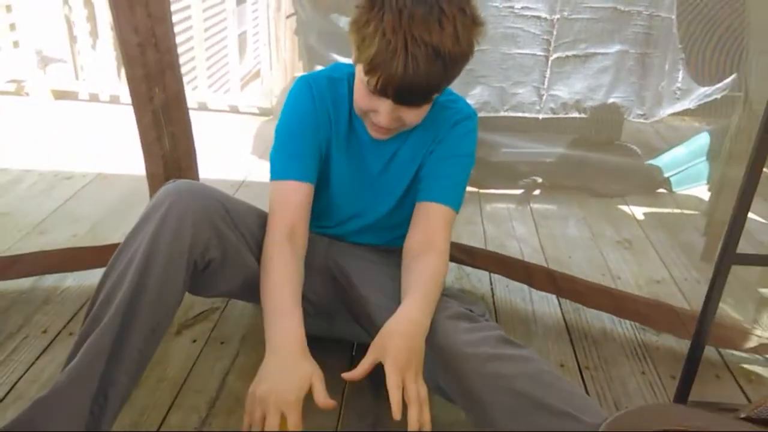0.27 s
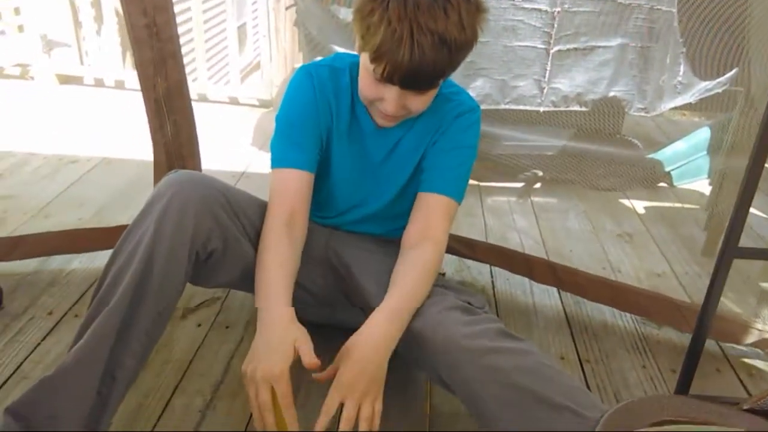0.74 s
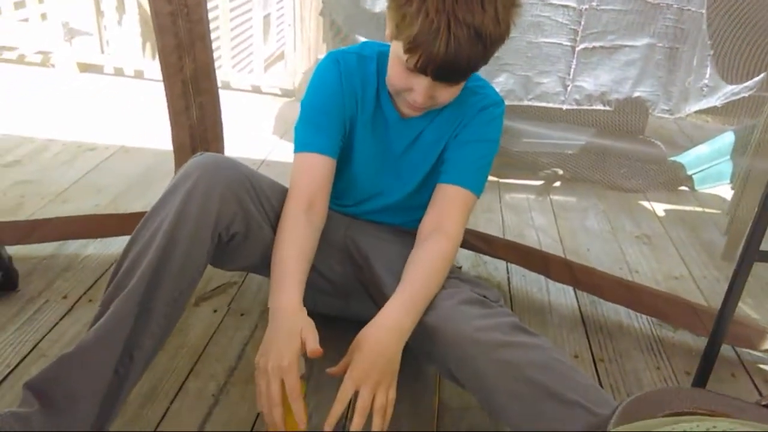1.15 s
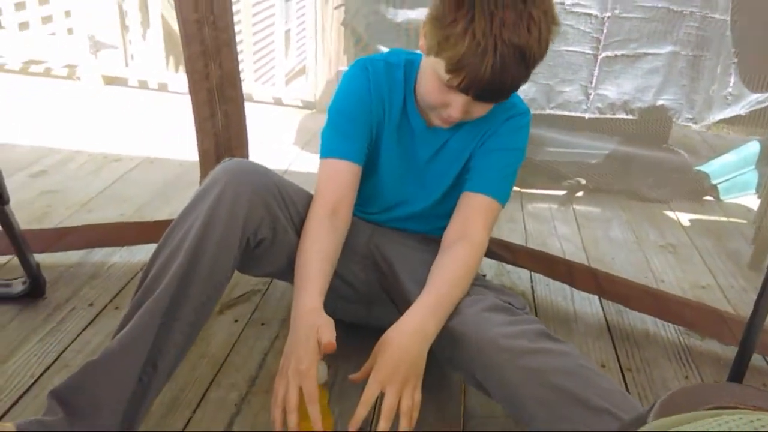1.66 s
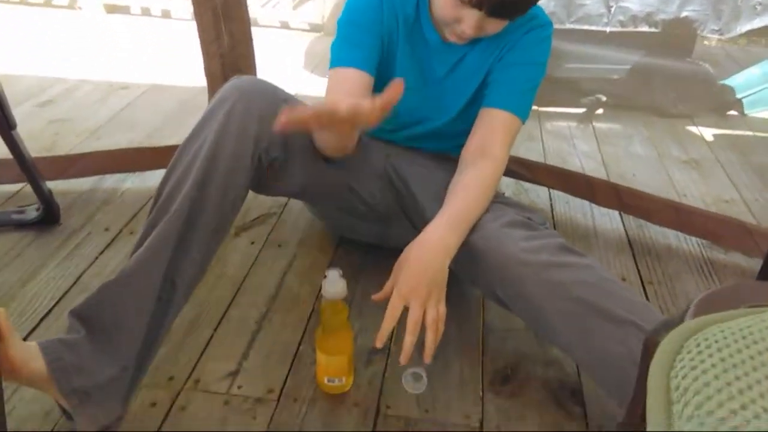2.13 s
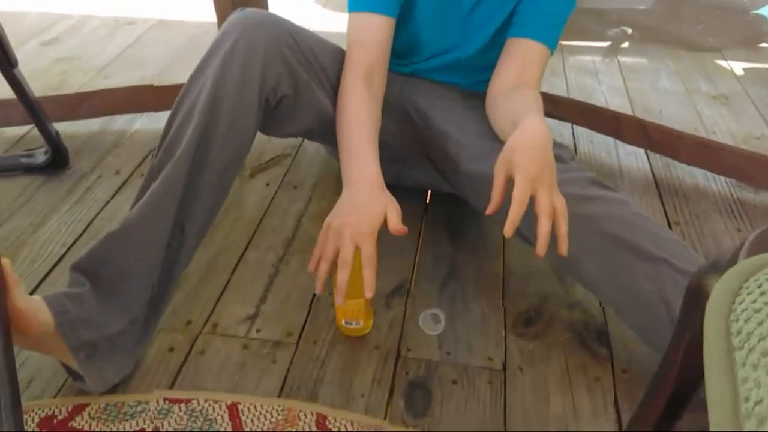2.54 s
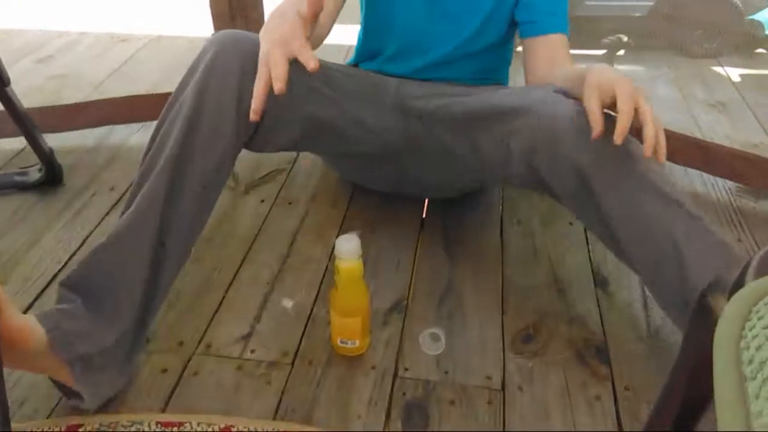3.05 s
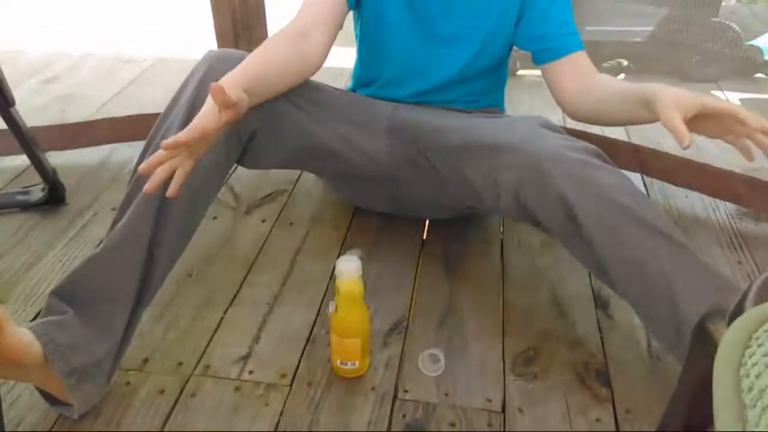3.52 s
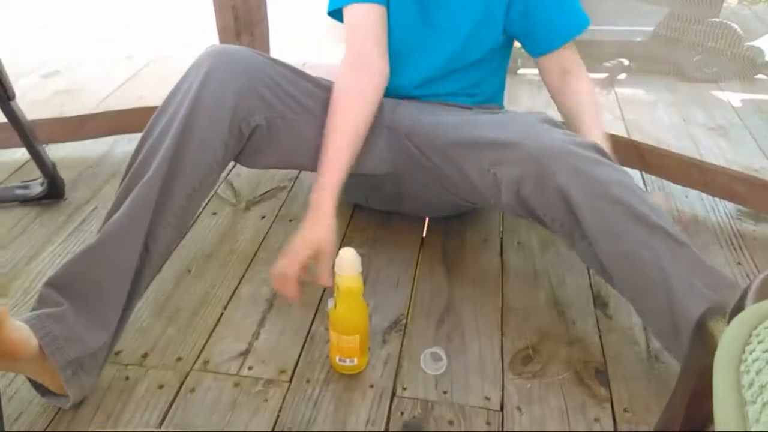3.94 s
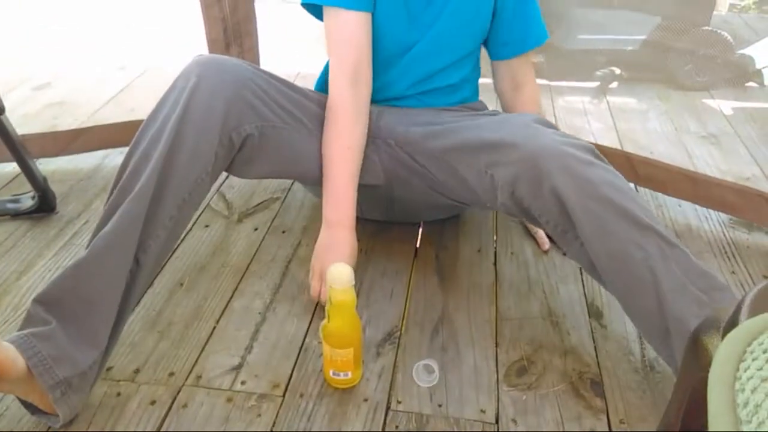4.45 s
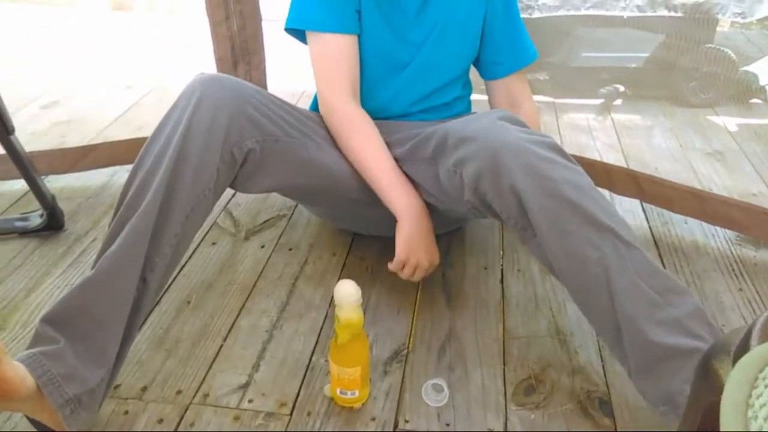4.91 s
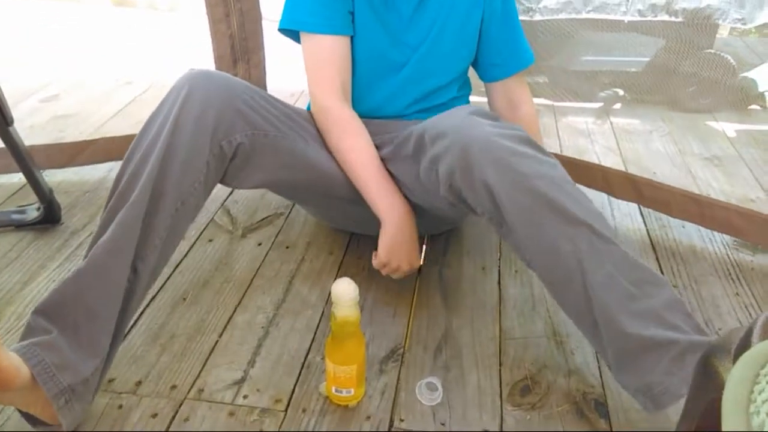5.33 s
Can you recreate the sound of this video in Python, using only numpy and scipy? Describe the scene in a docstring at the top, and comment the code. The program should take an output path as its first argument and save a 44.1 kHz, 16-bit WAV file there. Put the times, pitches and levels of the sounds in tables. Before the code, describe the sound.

Very close on an outdoor wooden porch, a dull slap on a plastic plunger opens the scene, its thump leaving a short hum. After two quiet seconds with a faint bird, a much louder slap cracks the stopper loose with a quick burst of gas. Boards hum, small plastic clacks and spits of fizz follow, then falling bird whistles over a soft outdoor hush.

```python
"""A palm slaps a plastic plunger on a glass soda bottle, near the microphone on porch boards: once in vain,
then the stopper pops. Blows and small ticks are noise and taps ringing body modes; gas and foam are coloured
noise, the gas with a sinking whistle. After each slap the deck hums and a diffuse noisy tail swells in steps
and dies away. Behind lie falling whistles of a near and a far bird, rustling cloth and a steady outdoor hush.
"""
import sys
import numpy as np
from scipy import signal
from scipy.fft import rfft, irfft, next_fast_len
from scipy.io import wavfile
from scipy.ndimage import uniform_filter1d, map_coordinates

SR = 44100
rng = np.random.default_rng(int(sys.argv[2]) if len(sys.argv) > 2 else 0)


def generate_wav(sig):
    """Save sig (samples, or channels by samples) to the path in sys.argv[1] as 16-bit PCM at SR."""
    pcm = np.round(np.clip(np.atleast_2d(sig).T, -1, 1) * 32767).astype(np.int16)
    wavfile.write(sys.argv[1], SR, pcm)


N = 245725


def amp(db):
    """Gain of a level in dB."""
    return 10 ** (np.asarray(db) / 20)


def unit(x):
    """x at rms 1."""
    return x / np.sqrt(np.mean(x ** 2) + 1e-20)


def along(points, hz):
    """Values of (frequency [Hz], value) points, read on a log frequency axis."""
    f, v = np.transpose(points)
    return np.interp(np.log(hz + 1), np.log(f + 1), v)


def curve(rows):
    """One value per sample through (time [s], value) points."""
    s, values = np.transpose(rows)
    return np.interp(np.arange(N) / SR, s, values)


def wobble(rate):
    """A smooth random curve, rate knots a second."""
    knots = rng.standard_normal(int(N * rate / SR) + 4)
    return map_coordinates(knots, [np.arange(N) * rate / SR])


def swells(rows):
    """Sum of bell-shaped gains from (middle [s], level [dB], half length [s]) rows."""
    t = np.arange(N) / SR
    return sum(amp(db) * np.exp(-((t - s) / half) ** 2) for s, db, half in rows)


def filtered(x, response):
    """x times a complex response of frequency."""
    m = next_fast_len(len(x) + SR // 2)
    return irfft(rfft(x, m) * response(np.fft.rfftfreq(m, 1 / SR)), m)[:len(x)]


def modes(table):
    """Causal response of (frequency [Hz], width [Hz], level [dB]) resonances with alternating signs."""
    def response(f):
        total = 0
        for k, (centre, width, db) in enumerate(table):
            resonance = 1j * f * width / (centre * centre - f * f + 1j * f * width)
            total = total + (-1) ** k * amp(db) * resonance
        return total
    return response


def rush(spectrum, spiky_db=0):
    """Coloured noise of rms 1; spiky sample sizes make it crackle."""
    size_curve = uniform_filter1d(rng.standard_normal(N), size=24) * np.sqrt(24)
    grains = rng.standard_normal(N) * amp(spiky_db * size_curve)
    return unit(filtered(grains, lambda hz: amp(along(spectrum, hz))))


def add(track, s, sound):
    """Mixes a sound into the track at a time in seconds."""
    part = track[max(round(s * SR), 0):][:len(sound)]
    part += sound[:len(part)]


def tail(t60s, seconds):
    """Diffuse noise of energy 1; each frequency dies at its own speed."""
    hz, t, z = signal.stft(rng.standard_normal(int(seconds * SR)), SR, nperseg=256)
    fade = amp(-60 * t / along(t60s, hz)[:, None])
    h = signal.istft(z * fade, SR, nperseg=256)[1]
    return h / np.linalg.norm(h)


def struck(table, hz, reach_db, clean, size):
    """A body rung by a clean tap and by chatter; the place of contact favours the modes near hz."""
    # a mode loses reach_db for each octave between it and hz
    response = modes([(c, w, db - reach_db * abs(np.log2(c / hz))) for c, w, db in table])
    chatter = unit(filtered(rng.standard_normal(size), response))
    ring = filtered(np.arange(size) == 0, response)
    return chatter + clean * ring / np.abs(ring).max()


# palm blows and the knocks that follow them:
# (time [s], crack level [dB], favoured crack pitch [Hz], thud level [dB], favoured thud pitch [Hz])
BLOW_EVENTS = [(0.0, -28.5, 3480, -32, 190), (0.011, -30, 2480, -38.5, 80), (2.144, -30, 2600, -26, 338),
               (2.152, -22, 2300, -37, 345), (2.155, -12.5, 1520, -29.5, 650),
               (2.157, -19.5, 5700, -42, 245), (2.1632, -18, 2400, -31, 130),
               (2.177, -25.5, 2600, -37, 130), (2.188, -34.5, 2804, -26.5, 320.3),
               (2.202, -29, 2980, -44, 249), (2.228, -31, 2504, -45, 150), (2.235, -34.5, 2106, -44, 150),
               (2.253, -45, 2500, -56, 150)]
# plastic and glass under the palm: (frequency [Hz], width [Hz], relative level [dB])
PLUNGER_MODES = [(670, 240, -11.5), (1464, 300, 1), (2107, 180, 1), (2400, 220, 3.5), (2700, 690, 2),
                 (3900, 1600, -3.5), (4761, 300, 1), (5740, 630, -3), (9100, 2200, -2)]
# porch boards under the bottle: (frequency [Hz], width [Hz], relative level [dB])
BOARD_MODES = [(74.9, 28, -13), (130, 26, 1), (230, 40, -5), (334, 34, 4), (400, 40, -6.5), (650, 89, -14)]
CRACK_T60_S, THUD_T60_S = 0.051, .085


def blows():
    """Each blow rattles the plunger and shakes the boards for a moment."""
    out, t = np.zeros(N), np.arange(SR // 4) / SR
    crack_fade = amp(-60 * t / CRACK_T60_S) * (1 - np.exp(-t / 0.0012))
    thud_fade = amp(-60 * t / THUD_T60_S) * (1 - np.exp(-t / 0.00084))
    for s, crack_db, crack_hz, thud_db, thud_hz in BLOW_EVENTS:
        plunger = struck(PLUNGER_MODES, crack_hz, reach_db=7.0, clean=3.3, size=len(t))
        boards = struck(BOARD_MODES, thud_hz, reach_db=13.0, clean=2.4, size=len(t))
        add(out, s, amp(crack_db) * crack_fade * plunger + amp(thud_db) * thud_fade * boards)
    return out


# gas flow past the stopper, a seep until it pops: (time [s], hiss level [dB])
JET_FLOW = [(2.138, -61.5), (2.144, -39.5), (2.153, -42), (2.156, -15.5), (2.167, -23.5), (2.19, -25),
            (2.222, -40.5), (2.28, -57.5), (2.4, -80)]
# colour of the gas hiss: (frequency [Hz], relative level [dB per Hz])
GAS_COLOUR = [(1760, -37), (3000, -4), (3330, -14), (6220, -14), (6810, -15.5), (8580, 0), (10700, -6),
              (11600, -7.5), (16000, -20)]
POP_S, WHISTLE_HZ, SINK_HZ_PER_S, LOWEST_HZ = 2.156, 9600, 25000, 8200
WHISTLE_DB = -1.5  # over the hiss
STALL_DB, STALL_SLOPE = -38, 2.2  # under this hiss level the whistle dies, by so many further dB per dB


def jet():
    """Broad gas hiss with a whistle band that sinks as the pressure falls."""
    t, hiss_db = np.arange(N) / SR, curve(JET_FLOW)
    whistle_db = hiss_db + WHISTLE_DB - STALL_SLOPE * np.maximum(STALL_DB - hiss_db, 0)
    centre_hz = np.clip(WHISTLE_HZ - SINK_HZ_PER_S * (t - POP_S), LOWEST_HZ, WHISTLE_HZ)
    # slow noise times a sine makes a narrow band around the sine
    band = unit(filtered(rng.standard_normal(N), lambda hz: np.exp(-(hz / 500) ** 2)))
    whistle = band * np.sin(2 * np.pi * np.cumsum(centre_hz) / SR)
    leaking = (t > JET_FLOW[0][0]) & (t < JET_FLOW[-1][0])
    return leaking * (amp(hiss_db) * rush(GAS_COLOUR, spiky_db=2.5) + amp(whistle_db) * whistle)


# colour of the fizz at the microphone, strongest around 8 to 10 kHz:
# (frequency [Hz], relative level [dB per Hz])
FIZZ_COLOUR = [(2350, -30), (4000, -9), (5310, -9.5), (6980, -12), (7700, -14), (8300, 1), (9300, 0.5),
               (11000, -7), (12000, -15.5), (15000, -21.5), (16000, -30)]
# the foam wells up: (middle [s], level [dB], half length [s])
FOAM_SURGES = [(2.94, -65.5, 0.055), (3.6, -79, .11), (4.3, -87, 0.091)]
# short bright bursts of hiss, three after the first slap, the others after the pop:
# (time [s], level [dB], held for [s])
HISS_BURSTS = [(.09, -70, .08), (0.186, -55, 0.02), (.515, -84, 0.035), (2.453, -67.5, 0.03),
               (2.531, -67.5, 0.026), (2.572, -66, 0.0049), (2.612, -70, 0.043), (2.69, -59.5, 0.024),
               (2.73, -65, 0.035), (2.791, -65.5, 0.017), (2.872, -71, 0.03), (3.15, -73.5, 0.018),
               (3.89, -76, 0.0081), (4.14, -80, 0.019)]
FIZZ_FROM_S, FIZZ_RISE_S, FIZZ_DB = 3.28, 0.16, -80  # the foam settles into a steady fizz
BURST_T60_S = 0.14


def foam():
    """Crackling noise for the foam's steady fizz and its surges, and for short bright bursts of hiss."""
    steady = amp(FIZZ_DB) * np.clip((np.arange(N) / SR - FIZZ_FROM_S) / FIZZ_RISE_S, 0, 1)
    level, t = steady + swells(FOAM_SURGES), np.arange(SR // 3) / SR
    for s, db, held in HISS_BURSTS:
        fade = amp(-60 * np.maximum(t - held, 0) / BURST_T60_S)
        add(level, s, amp(db) * fade * (1 - np.exp(-t / 0.0018)))
    flicker = amp(1.3 * wobble(20) + 1.0 * wobble(90))
    return level * flicker * rush(FIZZ_COLOUR, spiky_db=1.0)


# small ticks of plunger, glass and foam, levels before the fade:
# (time [s], body level [dB], favoured pitch [Hz], treble edge level [dB])
TICK_EVENTS = [(0.87, -66, 3520, -75), (1.216, -80, 3000, -74), (2.035, -64, 1786, -88),
               (2.785, -41.5, 2300, -59), (2.812, -55.5, 2400, -82), (2.937, -55, 1550, -88),
               (3.033, -65.5, 1365, -79), (3.157, -66, 1480, -70.5), (3.241, -66.5, 2600, -82),
               (4.021, -71, 2930, -91), (4.155, -69.5, 3130, -72), (4.335, -68.5, 1590, -82),
               (5.459, -80, 3990, -68.5)]
# loose plastic on glass: (frequency [Hz], width [Hz], relative level [dB])
LOOSE_MODES = [(706.5, 170, 0.5), (1070, 87, -4), (1549, 150, -4), (2220, 73, 2.5), (2600, 200, -6.5),
               (3480, 370, -1), (4400, 654, -5.5)]
TICK_T60_S = 0.06


def ticks():
    """A short clack of loose plastic with a bright edge."""
    out, t = np.zeros(N), np.arange(SR // 8) / SR
    rise = 1 - np.exp(-t / .001)
    fade = (amp(-60 * t / TICK_T60_S) + 2.3 * amp(-60 * t / .025)) * rise  # a faster fade on top
    treble = modes([(9600, 4000, 0)])
    for s, body_db, hz, edge_db in TICK_EVENTS:
        edge = unit(filtered(rng.standard_normal(len(t)), lambda f: treble(f) ** 2))
        body = struck(LOOSE_MODES, hz, reach_db=9.5, clean=2.9, size=len(t))
        clack = filtered(fade * body, lambda f: 1 / (1 + 1j * f / 8000) ** 3)  # dulls the treble
        add(out, s, amp(body_db) * clack + amp(edge_db) * fade * edge)
    return out


# the frame's hum after each slap: (start [s], level [dB], swell [s])
DECK_HUMS = [(.06, -51.5, 0.17), (2.245, -50.5, 0.132)]
# slow modes of the deck frame: (frequency [Hz], width [Hz], relative level [dB])
DECK_MODES = [(150, 9.9, 4.5), (207, 9.4, -1.5), (557, 17, -14)]
HUM_T60_S = 1.51


def deck():
    """Noise through narrow frame modes: an uneven hum for a second after each slap."""
    frame = modes(DECK_MODES)
    hum = filtered(rng.standard_normal(N), lambda f: frame(f) * (f / (f + 200)) ** 2)
    gain, t = np.zeros(N), np.arange(SR) / SR
    for s, db, swell in DECK_HUMS:
        fade = amp(-60 * np.maximum(t - swell, 0) / HUM_T60_S)
        add(gain, s, amp(db) * fade * np.minimum(t / swell, 1) ** 0.25)
    return gain * unit(hum)


# the diffuse tail after each slap: (start [s], level [dB], brightness [dB per octave])
TAIL_EVENTS = [(.09, -48, 2), (2.27, -50, 0.5)]
# colour of the tail: (frequency [Hz], t60 before the steps' own fade [s], level before the brightness [dB])
TAIL_COLOUR = [(80, 2.3, -18), (162, 1.4, 1), (298, 1.67, -2.5), (564, 2.13, 1), (1110, 1.84, -7),
               (2400, 1.33, -2), (4400, 0.82, -11.5), (7250, 0.48, -18), (8500, 0.53, -11.5),
               (10750, 0.22, -20), (12300, 0.19, -40), (16000, 0.14, -36)]
# steps in which the tail swells: (delay after its start [s], relative level [dB])
TAIL_STEPS = [(0, -1.5), (.05, -10), (.1, -15.5), (.21, -7), (.3, -6.5), (0.429, -8.5)]


def late_tail():
    """After each slap a diffuse noisy tail swells in steps and dies away, the treble soonest."""
    out = np.zeros(N)
    t60s, colour = [row[:2] for row in TAIL_COLOUR], [row[::2] for row in TAIL_COLOUR]
    for s, db, bright_db in TAIL_EVENTS:
        tilt = lambda hz: amp(along(colour, hz) + bright_db * np.log2(hz / 1000 + 0.039))
        noise = filtered(tail(t60s, 1.5), tilt)
        t, steps = np.arange(len(noise)) / SR, 0
        for delay, step_db in TAIL_STEPS:
            rise = np.clip((t - delay) / 0.028, 0, 1)
            steps = steps + amp(step_db) * rise * np.exp(-np.abs(t - delay) / 0.24)
        add(out, s, amp(db) * steps * noise / np.std(noise[:SR // 5]))
    return out * amp(1.5 * wobble(34.99) + 2.1 * wobble(12))  # the tail flutters


SWELL = 0.97  # a note swells and fades as a sine arch to this power


def whistles(notes):
    """Pure tones whose pitch falls towards the bottom one, some after a short rise."""
    out = np.zeros(N)
    for s, length, db, top_hz, bottom_hz, crest, fall in notes:
        t = np.arange(int(length * SR)) / SR
        hz = bottom_hz + (top_hz - bottom_hz) * np.exp(-((t - crest) / fall) ** 2)
        arch = np.abs(np.sin(np.pi * t / length)) ** SWELL
        add(out, s, amp(db) * arch * np.sin(2 * np.pi * np.cumsum(hz) / SR))
    return out


# whistles of the near bird, levels before the throb: (start [s], length [s], level [dB],
# top [Hz], bottom [Hz], top reached after [s], fall time [s])
NEAR_NOTES = [(3.93, 0.096, -56.5, 4000, 3238, 0.0025, 0.024), (4.13, .075, -60.5, 4410, 4074, 0, .02),
              (4.315, .14, -53.5, 2940, 2680, .035, .03), (4.44, .14, -52.5, 2852, 2434, .04, .048),
              (4.68, .13, -53, 2964, 2376, .028, .062), (5.29, 0.066, -60.5, 3740, 3004, 0.00032, 0.032)]
# a farther bird, same columns, levels before the breakup; a negative "reached after" begins mid-fall
FAR_BIRD_NOTES = [(1.76, .3, -68, 4200, 2817, -.1, .19), (3.09, 0.29, -71, 4110, 2960, -.1, .17)]


def bird():
    """The near bird throbs; close branches blur it, trees echo both birds, distance breaks up the far one."""
    near = whistles(NEAR_NOTES) * amp(2.38 * wobble(70))
    far = whistles(FAR_BIRD_NOTES) * wobble(450)
    blur = amp(-4.5) * signal.fftconvolve(near, tail([(3000, 0.13)], .2))[:N]
    scattered = (near + far) * wobble(500)
    trees = amp(-13.5) * signal.fftconvolve(scattered, tail([(3000, 1.0)], 0.72))[:N]
    return near + far + blur + trees


# hands and cloth moving: (middle [s], level [dB], half length [s])
RUSTLE_MOVES = [(.235, -50.5, 0.043), (.53, -63.5, 0.053), (.88, -74, .03), (2.0, -89, .15),
                (2.53, -59, 0.078), (2.75, -66, 0.14), (2.96, -60, 0.054), (3.2, -77, .15),
                (3.64, -65.5, 0.086), (3.99, -75, .06), (4.25, -72.5, .1)]
# colour of the cloth: (frequency [Hz], relative level [dB per Hz])
CLOTH_COLOUR = [(180, -35), (300, -3), (395, 0.5), (588, -4), (1940, -1.5), (2360, 3.5), (6780, -22),
                (8000, -15.5), (10400, -37.5), (17600, -120)]
# colour of the outdoor hush: (frequency [Hz], relative level [dB per Hz])
HUSH_COLOUR = [(15, -72), (25, -42.5), (70, -6), (205, -4), (275, -6), (380, -12.5), (435, -8),
               (498, -12.5), (977, -10.5), (1120, -13.5), (2580, -24.5), (4670, -33.5), (9160, -34),
               (15700, -34.5)]
# loudness of the hush: (time [s], level [dB])
HUSH_LEVEL = [(0, -60.5), (1, -66), (2, -66.5), (3, -63), (3.6, -67.5), (4.4, -67.5), (5.57, -69)]
CLOTH_DB = -75  # small movements all the time


def surroundings():
    """Coloured noise for moving cloth and for the steady outdoor hush."""
    movement = (amp(CLOTH_DB) + swells(RUSTLE_MOVES)) * amp(0.56 * wobble(15))
    cloth = movement * rush(CLOTH_COLOUR, spiky_db=3.5)
    hush = amp(curve(HUSH_LEVEL) + 0.7 * wobble(5.8)) * rush(HUSH_COLOUR)
    return cloth + hush


# reverberation of the porch: (frequency [Hz], t60 [s])
PORCH_T60 = [(200, 0.14), (2000, 0.18), (10000, .12)]


def scene():
    """Blows, jet and ticks ring in the porch; the other layers are added without it."""
    near = blows() + jet() + ticks()
    porch = amp(-9.5) * signal.fftconvolve(near, tail(PORCH_T60, .3))[:N]
    return (near + porch + foam() + deck() + late_tail() + bird() + surroundings())[None]


TOP_HZ = 15750  # middle of the microphone channel's 200 Hz wide upper edge


def record(dry):
    """The microphone channel cuts the deep bass and keeps nothing above its band limit."""
    bass_cut = lambda hz: (1j * hz / (1j * hz + 25)) ** 2
    band_limit = lambda hz: np.clip((TOP_HZ - hz) / 200 + .5, 0, 1)
    return filtered(dry[0], lambda hz: bass_cut(hz) * band_limit(hz))[None]


dry = scene()
out = record(dry)
generate_wav(out)
```